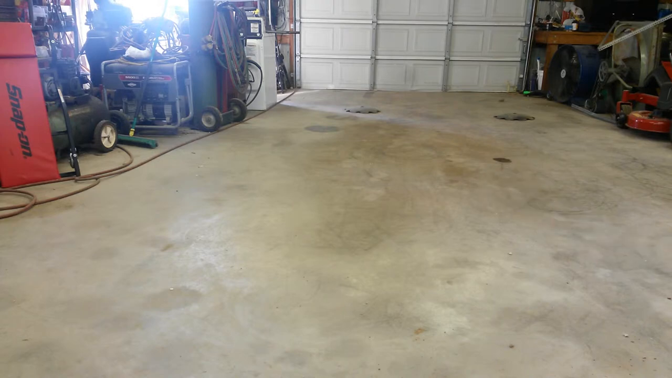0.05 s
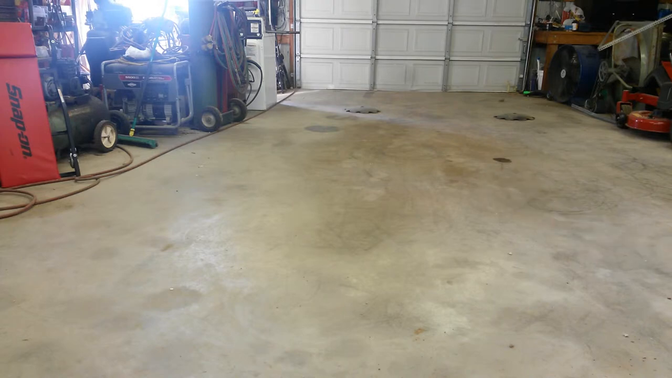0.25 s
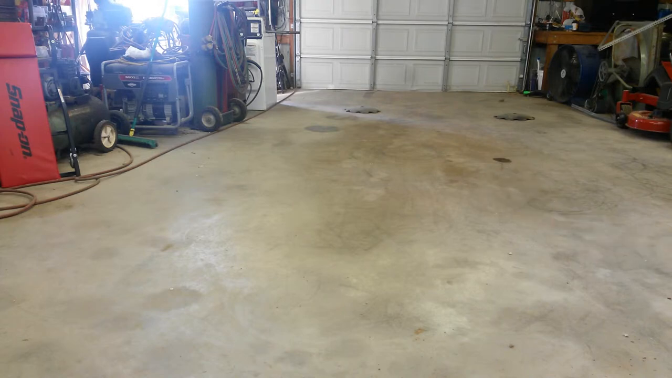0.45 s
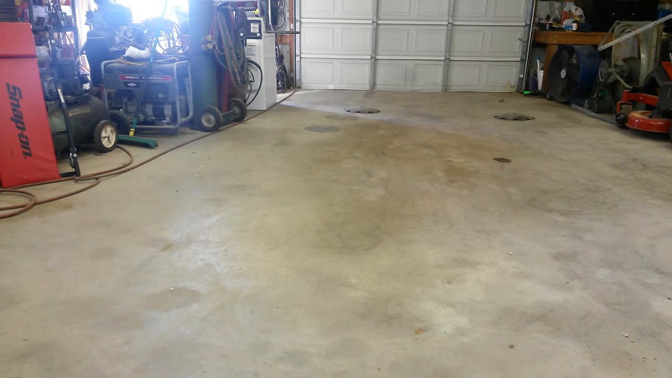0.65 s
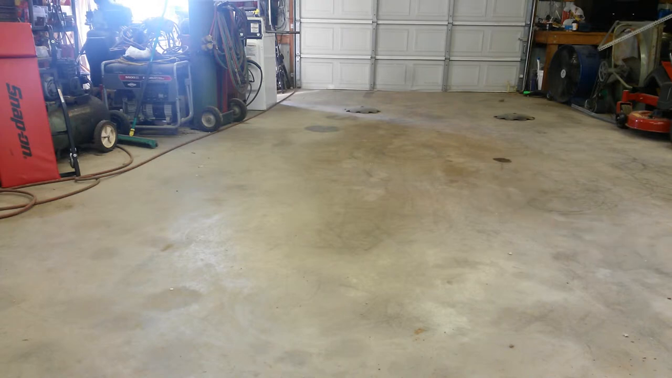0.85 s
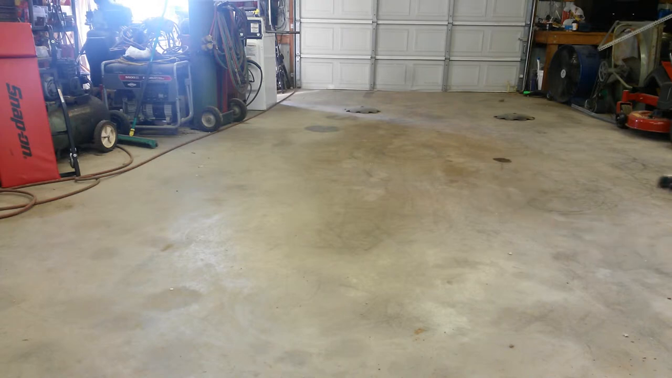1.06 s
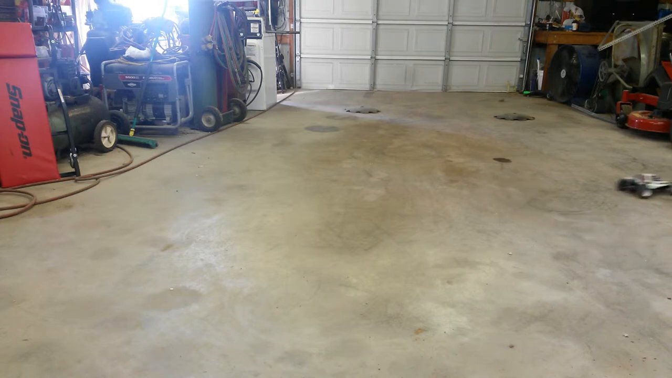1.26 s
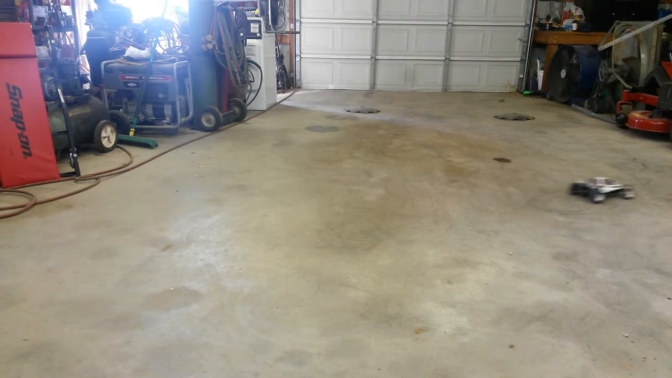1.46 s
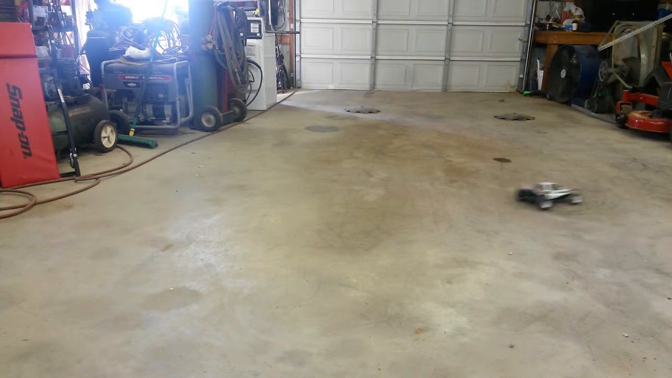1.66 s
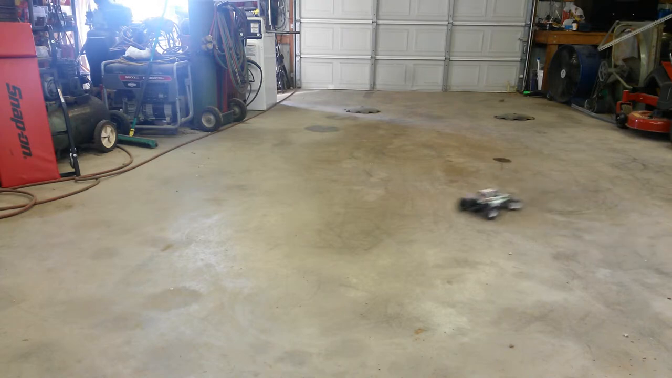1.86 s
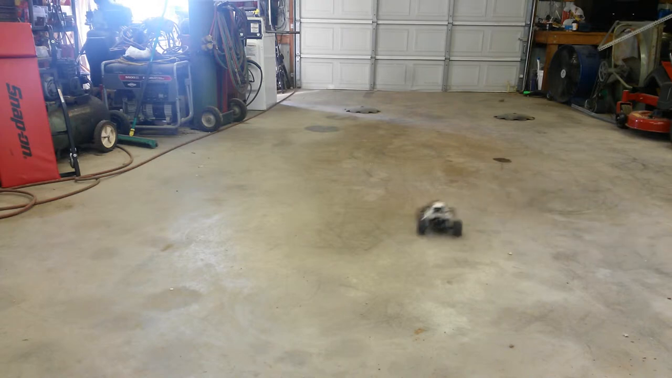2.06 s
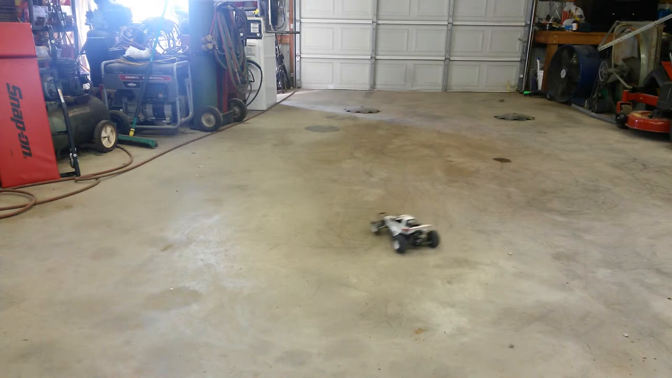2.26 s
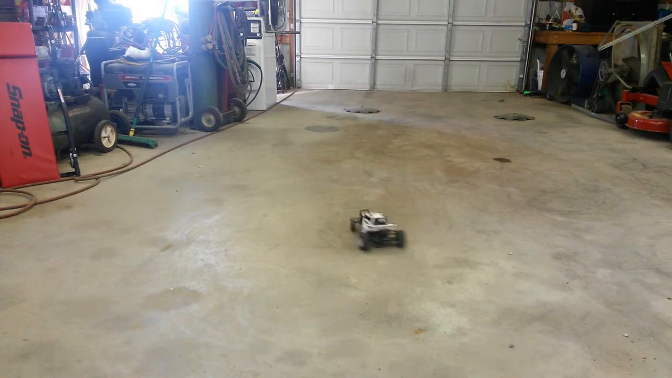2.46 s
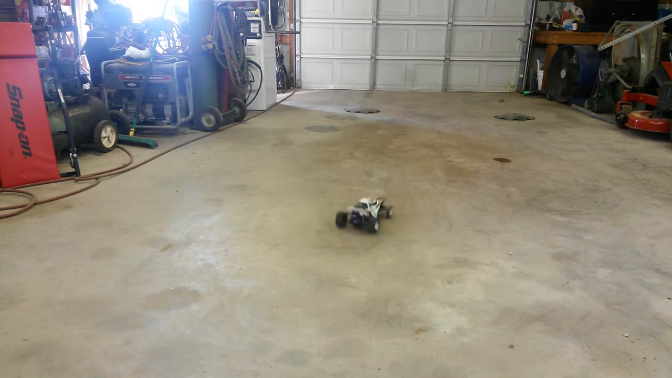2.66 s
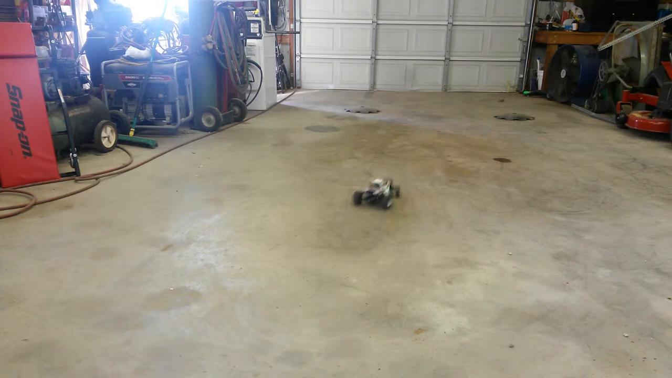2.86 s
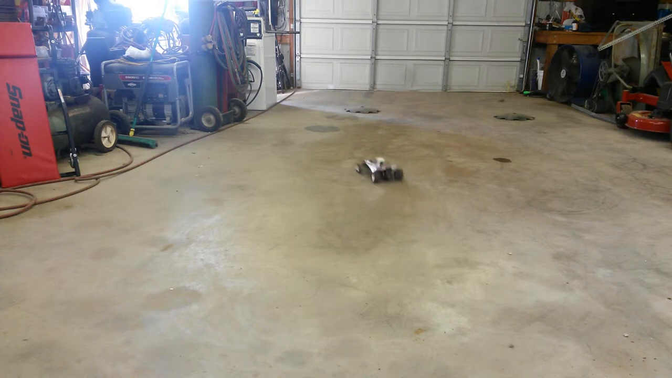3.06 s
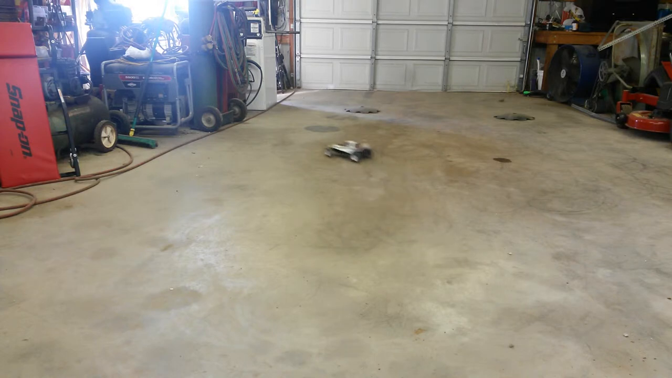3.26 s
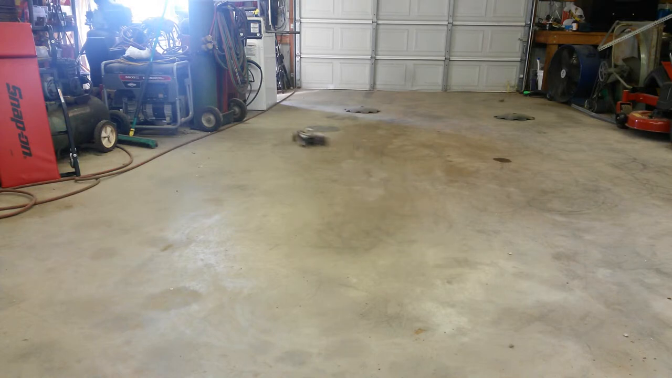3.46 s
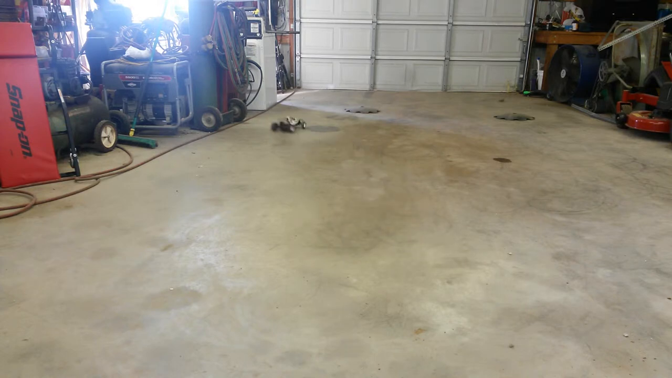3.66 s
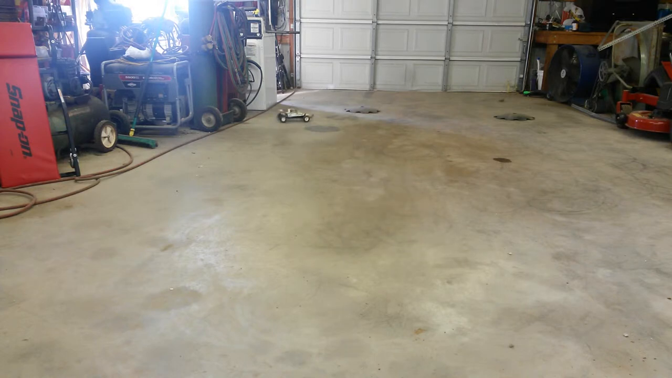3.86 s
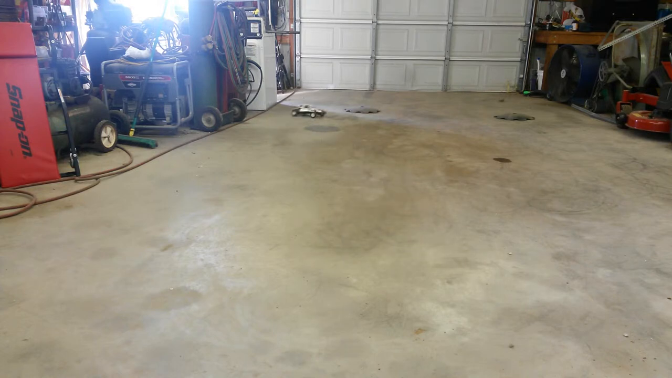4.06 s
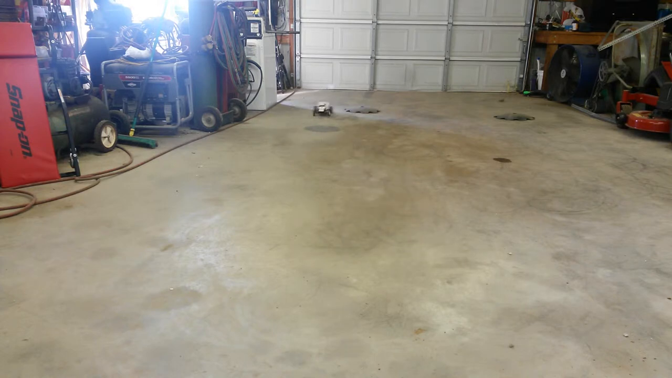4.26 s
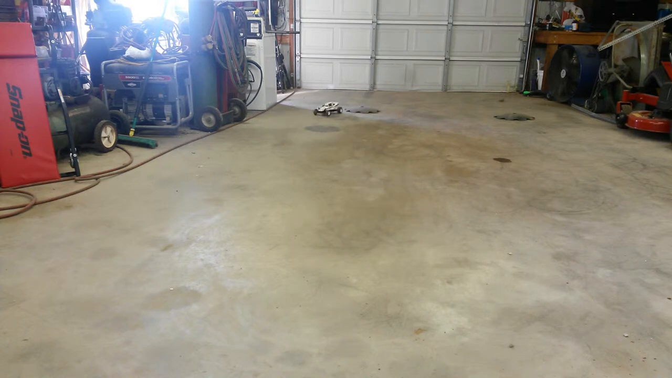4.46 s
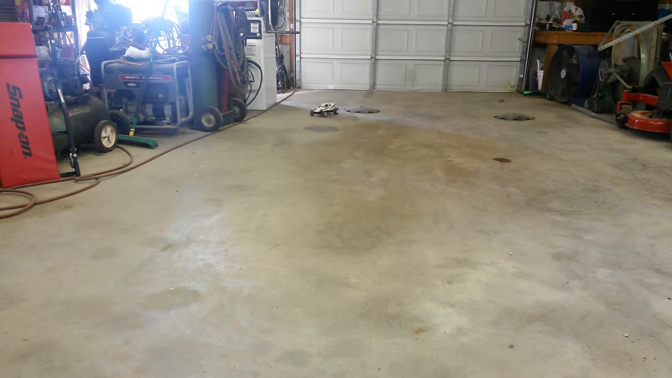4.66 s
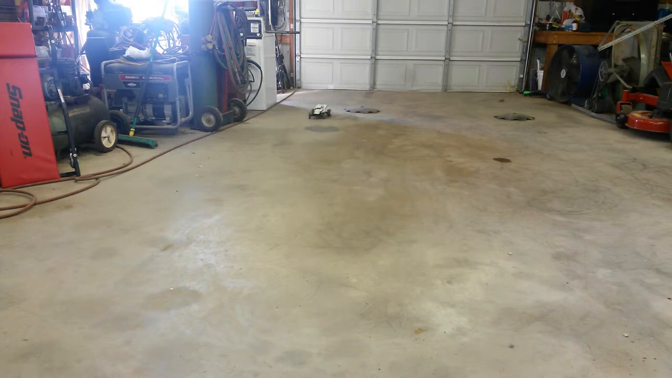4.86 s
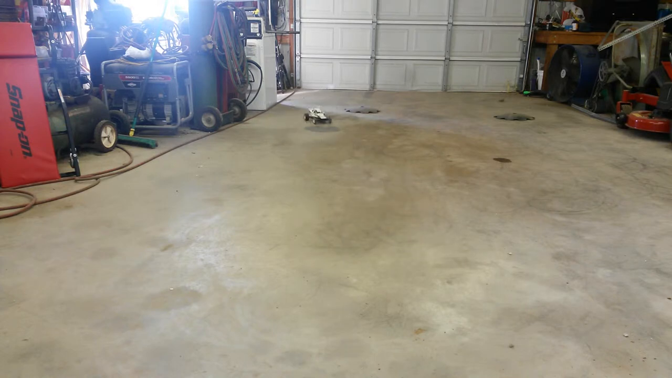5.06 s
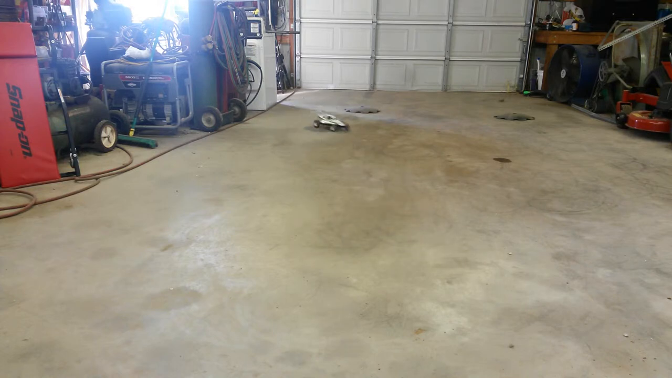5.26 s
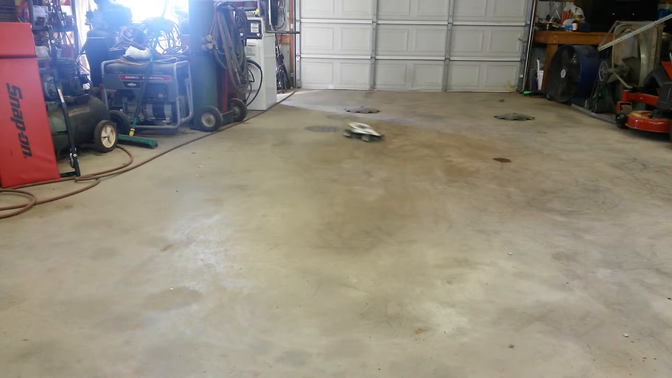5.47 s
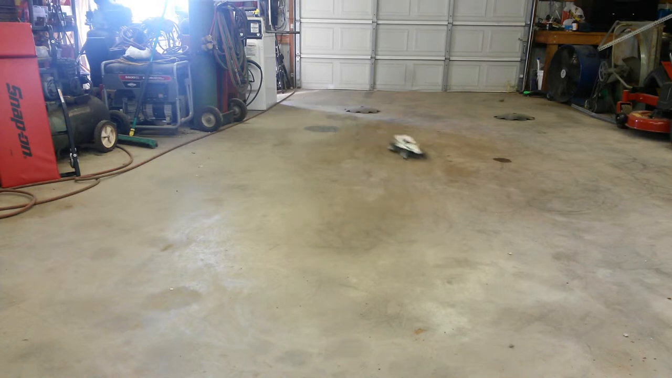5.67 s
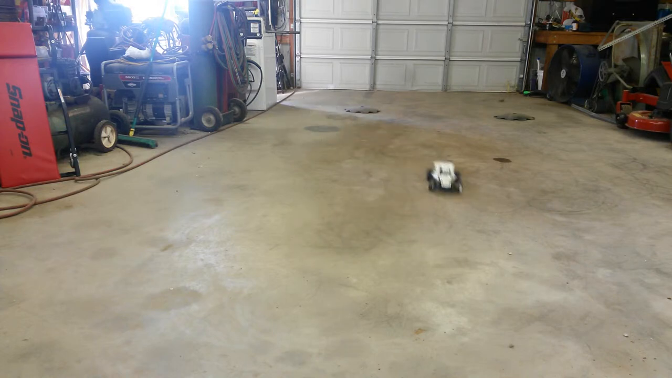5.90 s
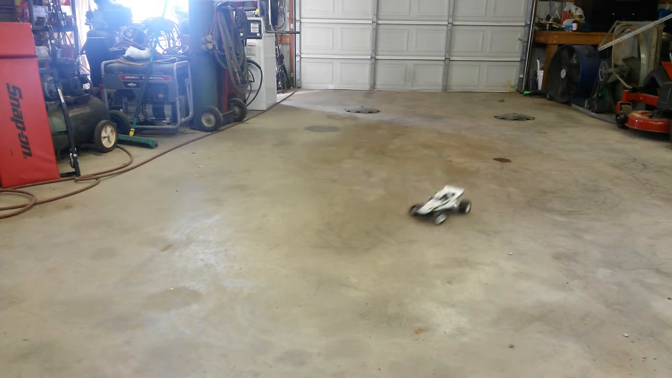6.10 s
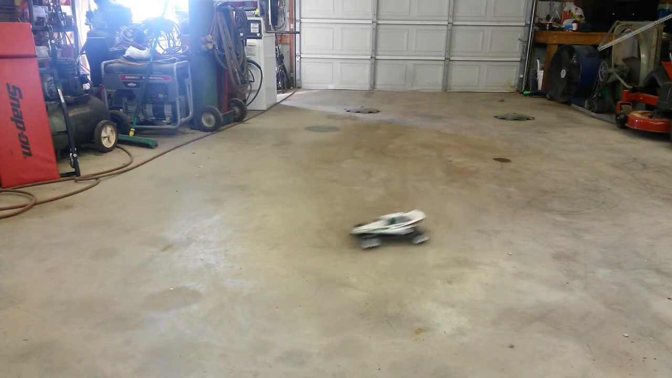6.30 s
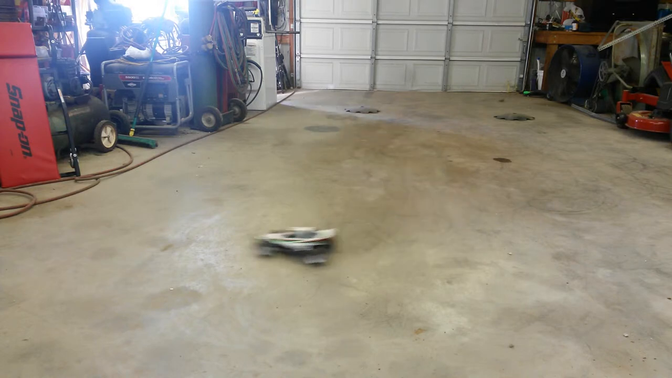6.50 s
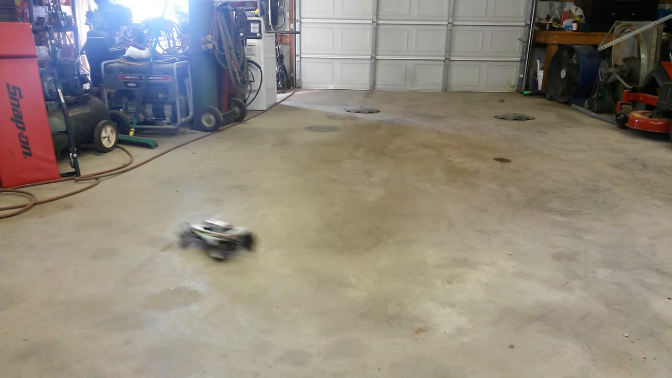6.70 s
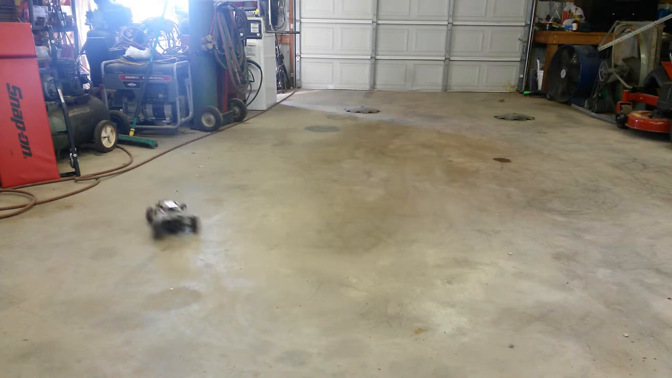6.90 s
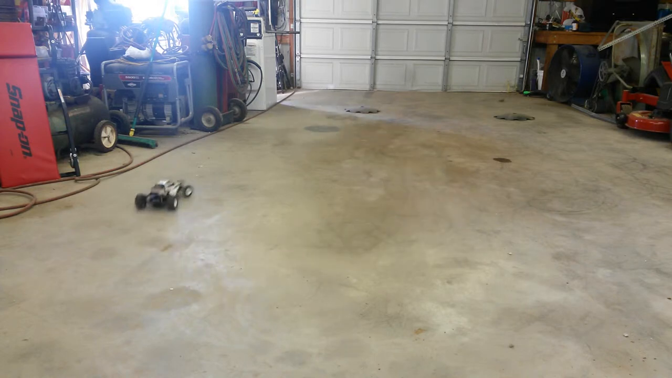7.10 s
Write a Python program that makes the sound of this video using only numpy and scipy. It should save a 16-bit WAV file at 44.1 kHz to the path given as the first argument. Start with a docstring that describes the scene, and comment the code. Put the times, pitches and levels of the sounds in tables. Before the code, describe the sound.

After two small clicks in a quiet garage, a toy-sized electric car hums away softly, then whines loudly, rattling and squeaking as it spins.

```python
"""Faint hum and hiss, noise dying away and a small click open the scene in a closed garage; then an electric
model car whines off gently, spins and darts about on concrete. Gear tones follow the tooth rate; clatter,
chassis drumming and tyre squeaks are filtered noise; the speed controller is a sine; clicks ring short modes.
Sparse decaying echoes make the garage; two unlike microphone ports listen near the floor."""
import sys
import numpy as np
from scipy import signal
from scipy.fft import rfft, irfft, next_fast_len
from scipy.io import wavfile
from scipy.ndimage import uniform_filter1d

SR = 44100
rng = np.random.default_rng(int(sys.argv[2]) if len(sys.argv) > 2 else 0)


def materialize(psi):
    """Save the field psi as 16-bit PCM at rate SR to the path in sys.argv[1].

    A 1-D psi becomes a single channel; in a 2-D psi each row is a channel.
    """
    bounded = np.clip(np.atleast_2d(psi).T, -1, 1)
    quanta = np.round(bounded * 32767).astype(np.int16)
    wavfile.write(sys.argv[1], SR, quanta)


N = 314874
TIME = np.arange(N) / SR


def gain_of(db):
    """Decibels to amplitude gain."""
    return 10 ** (np.asarray(db) / 20)


def evened(x):
    """Scales to rms 1."""
    return x / np.sqrt(np.mean(x ** 2) + 1e-20)


def read(points, hz):
    """Interpolates a spectrum on a log-frequency axis."""
    f, value = np.transpose(points)
    return np.interp(np.log(hz + 1), np.log(f + 1), value)


def curve(rows, column):
    """Interpolates one column of a time table at every sample."""
    rows = np.asarray(rows)
    return np.interp(TIME, rows[:, 0], rows[:, column])


def coloured(x, gain):
    """Filters by a zero-phase gain given as a function of frequency."""
    size = next_fast_len(N + 4096)
    return irfft(rfft(x, size) * gain(np.fft.rfftfreq(size, 1 / SR)), size)[..., :N]


def shaped(x, points):
    """Filters by a table of (frequency [Hz], gain [dB])."""
    return coloured(x, lambda f: gain_of(read(points, f)))


def resonance(f, hz, width_hz):
    """Gain of one resonance: 1 at its centre, half at the edges of its width."""
    return 1 / (1 + (2 * (f - hz) / width_hz) ** 2)


def wander(hz):
    """Random motion of rms 1, mostly slower than hz."""
    return evened(coloured(rng.standard_normal(N), lambda f: 1 / (1 + (f / hz) ** 2)))


# left-right likeness: (frequency [Hz], shared amplitude [0..1])
PORT_LIKENESS = [(60, 1), (200, 0.31), (400, 0.81), (700, 0.11), (1300, 0.043), (2400, 0.058)]


def paired(a, b):
    """Spaced ports hear the bass most alike, the treble nearly independently."""
    same = lambda f: np.clip(read(PORT_LIKENESS, f), 0, 1)
    right = coloured(a, same) + coloured(b, lambda f: np.sqrt(1 - same(f) ** 2))
    return np.array([a, right])


# still garage spectrum: (frequency [Hz], relative level [dB])
AIR_SPECTRUM = [(18, -48), (30, -11.5), (64, -9), (93, -10.5), (194, -13), (328, -19.5), (1010, -18),
                (1130, -30), (4300, -28.5), (7270, -32), (16000, -20.5)]
AIR_RMS_DB = -47.5


def air():
    """Faint hum and hiss of the still garage: steady shaped noise."""
    noise = paired(*rng.standard_normal((2, N)))
    return gain_of(AIR_RMS_DB) * evened(shaped(noise, AIR_SPECTRUM))


# earlier burst of the car, dying away: (frequency [Hz], relative level [dB])
FADING_SPECTRUM = [(180, -16), (300, -10.5), (885, -10), (1150, -14), (1230, -8), (2440, -12), (5160, -6.5),
                   (8360, -20.5), (16000, -18)]
FADING_START_DB, FADING_T60_S = -34.5, 1


def fading():
    """An earlier burst still dying away in the garage: wide noise under an exponential decay."""
    noise = shaped(paired(*rng.standard_normal((2, N))), FADING_SPECTRUM)
    return gain_of(FADING_START_DB - 60 * TIME / FADING_T60_S) * evened(noise)


# small clicks close by: (time [s], peak level [dB])
CLICK_TIMES = [(0.2064, -16), (0.5196, -20.5)]
# ringing of a click: (frequency [Hz], relative level [dB], t60 [s])
CLICK_RING_MODES = [(580, -6.5, 0.045), (2660, -6.5, 0.038), (4100, 4, 0.013), (4600, 12.5, 0.0068),
                    (5000, 1, 0.04), (8250, -5, 0.015), (14400, -20, .005)]


def clicks():
    """Each click is an impulse that rings the same short modes."""
    t, hits = np.arange(3000) / SR, np.zeros(N)
    ring = sum(gain_of(db - 60 * t / t60_s) * np.sin(2 * np.pi * hz * t)
               for hz, db, t60_s in CLICK_RING_MODES)
    for at_s, peak_db in CLICK_TIMES:
        hits[round(at_s * SR)] = gain_of(peak_db)
    return signal.oaconvolve(hits, ring / abs(ring).max())[:N]


# speed controller tone, dipping twice: (time [s], rms level [dB])
CHOPPER_LEVEL = [(.56, -78), (.592, -53), (.694, -45), (1.07, -40.5), (1.354, -45), (1.43, -64),
                 (1.475, -46.5), (1.682, -37), (1.92, -46.5), (1.98, -66), (2.04, -46), (2.17, -45),
                 (2.22, -70)]
CHOPPER_HZ = 970.8


def chopper():
    """Current chopped at a steady rate at part throttle makes the windings sing a pure tone."""
    on = (TIME > CHOPPER_LEVEL[0][0]) & (TIME < CHOPPER_LEVEL[-1][0])
    amplitude = on * np.sqrt(2) * gain_of(curve(CHOPPER_LEVEL, column=1))
    return amplitude * np.sin(2 * np.pi * CHOPPER_HZ * TIME)


# tyres breaking loose on concrete:
# (peak time [s], peak level [dB], time of the last 20 dB of rise [s], fall [dB/s], pitch [Hz])
TYRE_SQUEAKS = [(2.21, -15.5, .05, 152, 2160), (2.5, -17, 0.075, 42, 2140), (3.99, -24, 0.071, 400, 2104),
                (5.1, -25, 0.47, 92, 2180), (6.12, -35, 0.35, 125, 1390)]
SQUEAK_WIDTH_HZ = 460


def scrub():
    """Tyre rubber slips in random bursts and rings one narrow band per squeak."""
    slips = gain_of(5 * wander(hz=30)) * rng.standard_normal(N)
    out = 0
    for peak_s, peak_db, rise_s, fall_db_per_s, pitch_hz in TYRE_SQUEAKS:
        squeak = evened(coloured(slips, lambda f: resonance(f, pitch_hz, SQUEAK_WIDTH_HZ)))
        envelope_db = np.minimum(20 * (TIME - peak_s) / rise_s, fall_db_per_s * (peak_s - TIME))
        out = out + gain_of(peak_db + envelope_db) * squeak
    return out


# hard driving, a row per change of throttle or grip: (on [s], off [s], whine level [dB],
# clatter level before its trim [dB], drumming level [dB], lift of the lowest gear tone [dB],
# rise [dB/s], clatter fall while coasting [dB/s])
HARD_BURSTS = [(2.197, 2.698, -12, -23.5, -36.5, -3.5, 338, 60),
               (2.66, 3.104, -12.5, -23.5, -35.5, -1, 600, 60), (3.07, 3.76, -11, -25, -35, -8, 600, 17),
               (3.957, 4.597, -12.5, -25.5, -40.5, -7, 800, 76),
               (4.543, 4.681, -21, -24.5, -48, 0.5, 600, 189), (4.843, 5.06, -16, -26, -37.5, -3, 413, 60),
               (5.03, 5.195, -19, -26, -44, -1, 600, 60), (5.175, 5.712, -13.5, -28, -36.5, -4, 600, 60),
               (5.697, 5.93, -15, -28, -37, -11, 602, 28), (6.006, 6.122, -24, -30.5, -43, 0.5, 600, 39),
               (6.201, 6.27, -16, -24, -36, -2, 700, 62),
               (6.257, 6.566, -11.5, -26.5, -34.5, -6.5, 600, 63),
               (6.797, 6.89, -20, -21.5, -53, -9, 328, 60),
               (6.864, 7.094, -11.5, -24.5, -36, -6.5, 800, 83)]


def burst_shapes(falls=1):
    """Each burst in dB re its hold level: climbs the last 20 dB, holds, falls while coasting."""
    on_s, off_s, *_, rise, fall = np.transpose(HARD_BURSTS)[:, :, None]
    climb_db = np.minimum(0, rise * (TIME - on_s) - 20 - 60 * (TIME < on_s))
    return climb_db - falls * fall * np.maximum(TIME - off_s, 0)


# gentle start at part throttle: (time [s], tooth rate [Hz], whine level [dB],
# clatter level before its trim [dB], drumming level [dB], lift of the lowest gear tone [dB],
# tooth strain [1 = full])
GENTLE_START = [(.56, 325.4, -47, -58.5, -65, -2, -0.4), (.72, 463.7, -29, -50.5, -55.5, -3, 0.38),
                (.95, 650, -32.5, -41, -48.5, 14, 0.79), (1.2, 916, -27.5, -34, -49.5, 2.5, -0.38),
                (1.5, 1108, -31, -36.5, -50.5, 8, -0.5), (1.75, 1250, -32, -35.5, -47.5, 7.5, -0.39),
                (2.0, 1335, -37, -36, -45.5, 14, -0.37), (2.21, 1399, -35, -31, -39, 17, -0.56)]
GENTLE_END_S = GENTLE_START[-1][0]


def level_db(column, falls=1):
    """Level of one layer: the louder of the gentle start and the loudest burst."""
    gentle_db = curve(GENTLE_START, column) - 100 * np.maximum(TIME - GENTLE_END_S, 0)
    hold_db = np.array(HARD_BURSTS)[:, column, None]
    return np.maximum(gentle_db, (hold_db + burst_shapes(falls)).max(0))


# low modes of the plastic tub: (frequency [Hz], width [Hz], relative level [dB])
CHASSIS_MODES = [(576, 82, 5), (660, 163, 2.5), (930, 98, -0.5), (426, 150, -21.5), (257, 22, -24),
                 (1640, 450, -4)]
GRIT_RMS_DB = 1.2  # unevenness of the floor grit
DRUM_FALL_RATIO = 0.48  # re clatter fall


def chassis():
    """Floor grit shakes the low modes of the plastic tub, which answers changes of drive slowly."""
    grit = gain_of(GRIT_RMS_DB * wander(hz=24.5)) * rng.standard_normal(N)
    modes = lambda f: sum(gain_of(db) * resonance(f, hz, width_hz) for hz, width_hz, db in CHASSIS_MODES)
    drive_db = uniform_filter1d(level_db(column=4, falls=DRUM_FALL_RATIO), size=3000)
    return gain_of(drive_db) * evened(coloured(grit, modes))


# colour of shell and microphone together: (frequency [Hz], gain [dB])
SHELL_COLOUR = [(410, -40.5), (700, -39), (808, -36), (946, -21), (1150, -21.5), (2530, -7.5), (3030, -19),
                (3200, -17), (5190, -0.5), (8650, -12), (12000, -3), (14400, -14), (15400, -32),
                (16000, -61)]
# extra clatter colour up to the first hard burst: (frequency [Hz], gain [dB])
GENTLE_TINT = [(700, 7), (1800, 1.5), (3200, 7), (5000, -3.5), (6200, 1), (8500, -4.5), (11000, 0.5),
               (13500, -2)]
CLATTER_TRIM_DB = 7.5


def clatter():
    """Backlash rattle and tyre scrub: noise in uneven bursts through the shell."""
    unevenness_db = 1.35 * wander(hz=30.6) + 1.04 * wander(hz=310)
    bursts = gain_of(unevenness_db) * rng.standard_normal(N)
    rattle = evened(shaped(bursts, SHELL_COLOUR))
    rattle = np.where(TIME < HARD_BURSTS[0][0], shaped(rattle, GENTLE_TINT), rattle)
    return gain_of(level_db(column=3) + CLATTER_TRIM_DB) * rattle


# a new speed at each change of throttle or grip: (time [s], goal tooth rate [Hz], lag [s])
SPEED_GOALS = [(2.218, 2180, .04), (2.3, 2370, .04), (2.88, 2450, .06), (3.105, 2670, .03),
               (3.36, 2500, .15), (3.63, 2820, .03), (3.86, 1400, .08), (3.955, 2150, .025),
               (4.012, 2420, .005), (4.03, 2660, .04), (4.2, 2590, .1), (4.52, 2440, .12), (4.7, 900, .2),
               (4.856, 2040, .018), (5.02, 2560, .008), (5.14, 1995, .004), (5.205, 2520, .006),
               (5.72, 2760, .05), (6.008, 2235, .008), (6.13, 1200, .13), (6.21, 2110, .015),
               (6.268, 2500, .005), (6.31, 2625, .04), (6.68, 300, .1), (6.82, 5000, .17),
               (6.878, 2210, .012), (6.932, 2490, .006)]


def mesh():
    """Tooth rate in Hz: the gentle start, then an exponential approach to each new speed."""
    hz = curve(GENTLE_START, column=1)
    for start_s, goal_hz, lag_s in SPEED_GOALS:
        at = round(start_s * SR)
        hz[at:] = goal_hz + (hz[at] - goal_hz) * np.exp(-(TIME[at:] - start_s) / lag_s)
    return hz


HOP_START_S, HOP_GROWS_S, HOP_DIES_S = 2.3, .09, .5
HOP_HZ, HOP_PEAK_S, HOP_SWING = 15.9, 2.397, .08  # swing as a share of speed, before its envelope
TREMBLE = .016  # random share of speed, rms before slow drift is removed


def teeth(hz):
    """Teeth passed since the start: after the hard start wheel hop swings the speed, and it trembles."""
    since_s = np.maximum(TIME - HOP_START_S, 0)
    tremble = wander(hz=26.2)
    tremble = tremble - uniform_filter1d(tremble, size=8000)  # no slow drift
    envelope = np.minimum(since_s / HOP_GROWS_S, 1) * np.exp(-(since_s / HOP_DIES_S) ** 2)
    hop = HOP_SWING * envelope * np.cos(2 * np.pi * HOP_HZ * (TIME - HOP_PEAK_S))
    jitter = 0.0034 * wander(hz=303.5)
    return np.cumsum(hz * (1 + hop + TREMBLE * tremble * (since_s > 0) + jitter)) / SR


def tooth_strain(hz, gentle):
    """Tooth strain: tabled in the gentle start, then greater under power at lower speed."""
    unstrained_hz, strained_hz = 2330, 2040
    powered = sum((TIME > on_s) & (TIME < off_s)
                  for on_s, off_s, whine_db, *_ in HARD_BURSTS if whine_db > -24) > 0
    hard = powered * np.clip((unstrained_hz - hz) / (unstrained_hz - strained_hz), 0, 1)
    return uniform_filter1d(np.where(gentle, curve(GENTLE_START, column=6), hard), size=600)


# gear tones: (multiple of the tooth rate, relative level [dB], gain at full strain [dB])
GEAR_ORDERS = [(1, -8, 7), (2, -5, -4), (3, -2.5, 14.5), (4, 4, 6.5), (5, -7, 0), (6, -8.5, 14), (7, 1, -8),
               (8, 1, 12)]
# how the gearbox radiates its tones: (frequency [Hz], gain [dB])
GEARBOX_COLOUR = [(400, -35), (700, -23), (1400, -6), (2400, -2), (3300, -11), (4400, -3.5), (5200, 3),
                  (6200, -7.5), (7200, -8), (8800, -39), (10500, -14.5), (13000, -8), (15000, -24)]
PINION_TEETH = 13
WHINE_FALL_RATIO = 5.4  # re clatter fall
STRAINED_WHINE_DB = -5  # whole whine at full strain, hard driving only
UPPER_LOSS_DB, UPPER_FULL_HZ, UPPER_SPAN_HZ = -20, 1240, 300  # orders above 2 at a crawl
GENTLE_LOOSE = .35  # share of rattle in the teeth


def whine(hz):
    """Tooth-rate tones: rattling teeth flutter in size and phase; strain steadies them in hard driving."""
    turns, gentle = teeth(hz), TIME < GENTLE_END_S
    strain = tooth_strain(hz, gentle)
    burst_lift_db = np.array(HARD_BURSTS)[burst_shapes().argmax(0), 5]
    lowest_db = np.where(gentle, curve(GENTLE_START, column=5), burst_lift_db)
    lowest_db = uniform_filter1d(lowest_db, size=600)
    load = gain_of(0.56 * wander(hz=51.6)) * (1 + 0.31 * np.cos(2 * np.pi * turns / PINION_TEETH))
    upper_db = gentle * UPPER_LOSS_DB * np.clip((UPPER_FULL_HZ - hz) / UPPER_SPAN_HZ, 0, 1)
    loose = np.where(gentle, GENTLE_LOOSE, 1 - .6 * np.clip(strain, 0, 1))
    tones = 0
    for k, db, strained_db in GEAR_ORDERS:
        lift_db = (k == 1) * lowest_db + strain * strained_db + (k > 2) * upper_db
        rattle = wander(hz=32 * (k + 1)) + 1j * wander(hz=32 * (k + 1))
        flutter = 1.26 * (1 - loose) + 0.53 + loose * rattle
        tones = tones + gain_of(db + lift_db) * (flutter * np.exp(2j * np.pi * k * turns)).real
    whine_db = level_db(column=2, falls=WHINE_FALL_RATIO) + STRAINED_WHINE_DB * strain * ~gentle
    return gain_of(whine_db) * evened(shaped(load * tones, GEARBOX_COLOUR))


# garage decay: (frequency [Hz], t60 [s])
GARAGE_T60 = [(300, 0.12), (1300, 0.91), (4000, 0.91), (12000, 0.24)]


def tail():
    """Sparse echoes of random sign, each band dying at its own speed; a set per port, energy of the left 1."""
    taps = np.zeros((2, SR))
    at = np.arange(200, SR - 20, 20) + rng.integers(0, 20, (2, (SR - 201) // 20))
    np.put_along_axis(taps, at, rng.choice([-1., 1.], at.shape), 1)
    hz, t, z = signal.stft(taps, SR, nperseg=256)
    decay = gain_of(-60 * t / read(GARAGE_T60, hz)[:, None])
    echoes = signal.istft(z * decay, SR, nperseg=256)[1][:, :SR]
    return echoes / np.linalg.norm(echoes[0])


def garage(x):
    """Echo of a source that stays put."""
    return paired(*signal.fftconvolve(x[None], tail(), axes=1)[:, :N])


# garage echo of the car, low while it is close: (time [s], level [dB])
CAR_ECHO = [(0, -3), (2.1, -7.5), (3.5, -8), (5, -5), (6, -3), (7.14, -8)]


def nearby(x, count=8):
    """The moving car cycles through spots, each with its own paths to the ports and its own echoes."""
    out, wet = np.zeros((2, N)), gain_of(curve(CAR_ECHO, column=1))
    for spot in range(count):
        apart = (TIME / .11 - spot + count / 2) % count - count / 2  # .11 s per spot
        visit = x * np.cos(np.pi / 2 * np.clip(apart, -1, 1))  # squares of neighbouring visits sum to 1
        sparse = rng.standard_normal((2, 400)) * (rng.random((2, 400)) < .05)
        paths = 0.23 * sparse * np.exp(-np.arange(400) / 130)  # floor and microphone stand
        paths[[0, 1], rng.integers(0, 24, 2)] += .65  # straight path, its own delay to each port
        out += signal.oaconvolve(visit[None], paths, axes=1)[:, :N]
        out += signal.fftconvolve((visit * wet)[None], tail(), axes=1)[:, :N]
    return paired(*out)


SETS_OFF_S = .54
TONE_ECHO_DB, CLICK_ECHO_DB = -18, -13


def scene():
    """Still air, fading noise, clicks, controller tone, their echo and the car."""
    ticks, tone = clicks(), chopper()
    echo = garage(gain_of(TONE_ECHO_DB) * tone + gain_of(CLICK_ECHO_DB) * ticks)
    car = (scrub() + chassis() + clatter() + whine(mesh())) * (TIME > SETS_OFF_S)
    tone_pair = tone * gain_of([[-3], [2]])  # left, right [dB]
    return air() + fading() + ticks + tone_pair + echo + nearby(car)


# port balance: (frequency [Hz], left over right [dB])
PORT_BALANCE = [(60, 0.0), (92, 0.0), (140, 0.0), (210, -0.5), (330, -1.0), (500, -2.5), (770, -2.5),
                (1170, -2.0), (1790, 0.0), (2740, 2.0), (4190, 11.5), (6410, 9.0), (9810, -10.0),
                (15000, -13.0)]
EDGE_HZ = 15900


def record(dry):
    """Left port favours the middle treble, right the top; then bass cut, gain control, rounding, band limit."""
    # power shares of the two ports sum to 1
    left = lambda f: 1 / (1 + gain_of(-2 * read(PORT_BALANCE, f)))
    dry = coloured(dry, lambda f: np.sqrt(2 * np.array([left(f), 1 - left(f)])))
    dry = coloured(dry, lambda f: f ** 2 / (f ** 2 + 45 ** 2))  # the microphone drops the deepest bass
    # slow gain control: takes off 0.18 dB per dB above -22.5 dB
    power_db = 10 * np.log10(abs(uniform_filter1d((dry ** 2).mean(0), 9000)) + 1e-12)
    dry = dry / gain_of(0.18 * np.maximum(power_db + 22.5, 0))
    dry = np.tanh(dry)  # the input stage rounds off the highest peaks
    band_limit = signal.firwin(511, EDGE_HZ, window=("kaiser", 9), fs=SR)
    return signal.oaconvolve(dry, band_limit[None], "same")


dry = scene()
out = record(dry)
materialize(out)
```